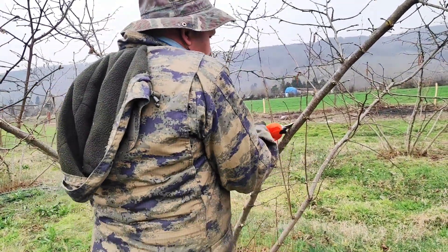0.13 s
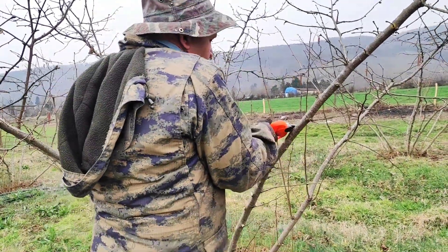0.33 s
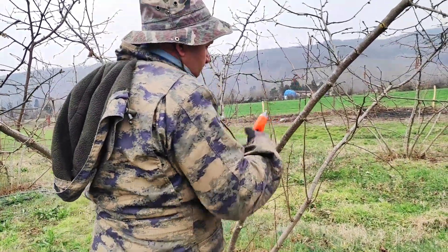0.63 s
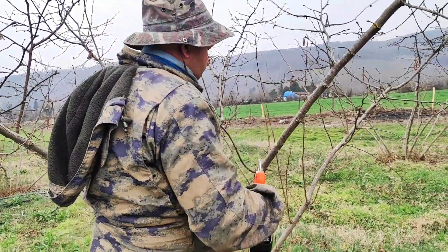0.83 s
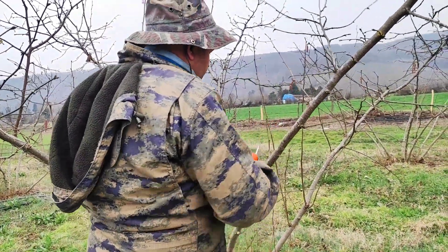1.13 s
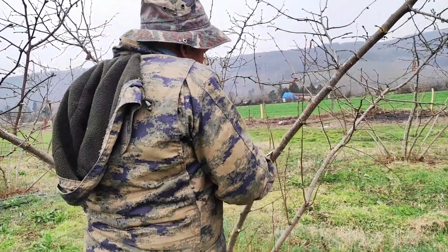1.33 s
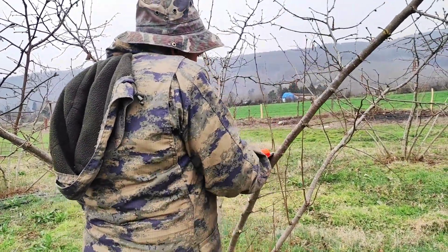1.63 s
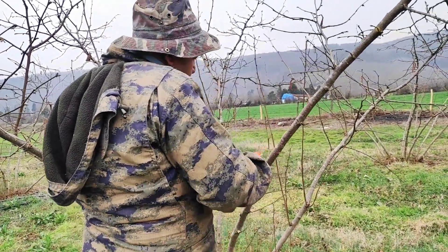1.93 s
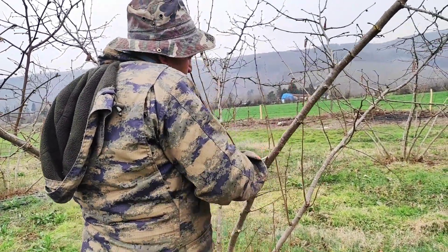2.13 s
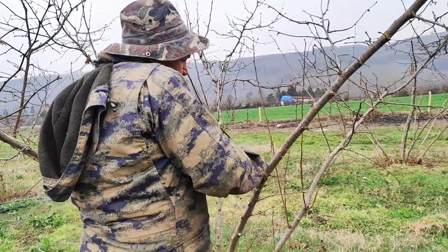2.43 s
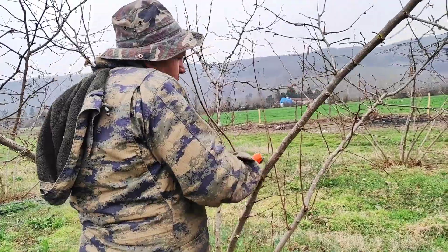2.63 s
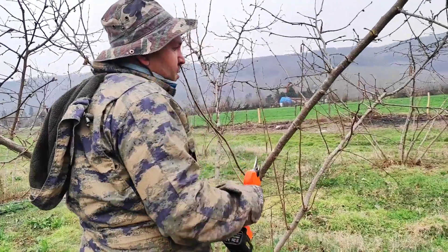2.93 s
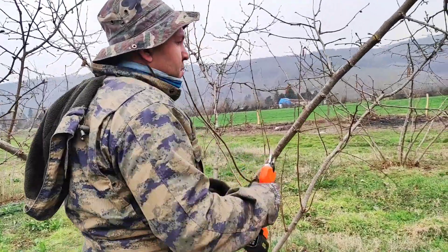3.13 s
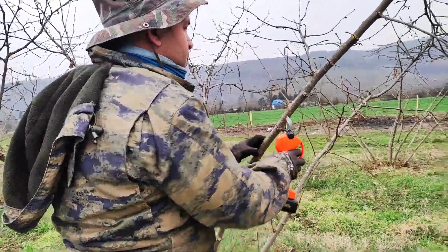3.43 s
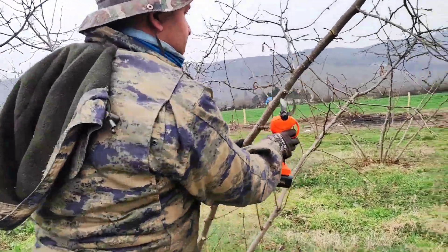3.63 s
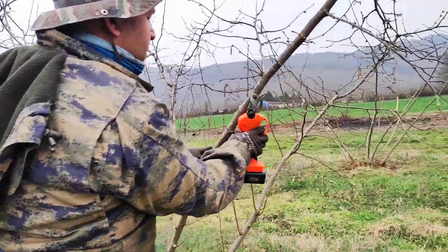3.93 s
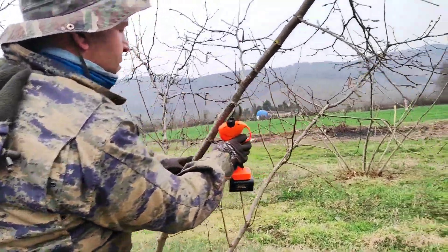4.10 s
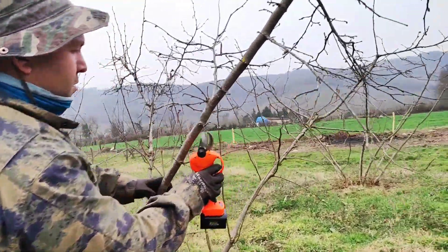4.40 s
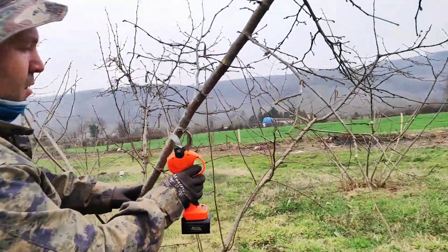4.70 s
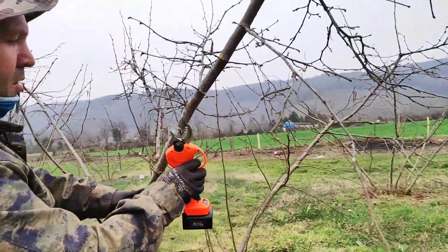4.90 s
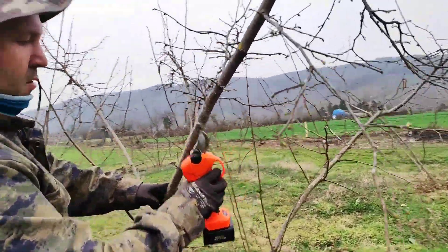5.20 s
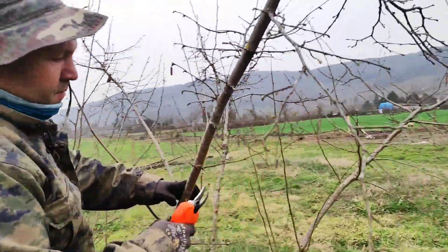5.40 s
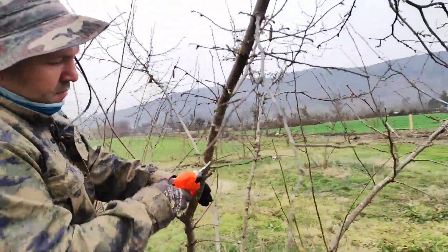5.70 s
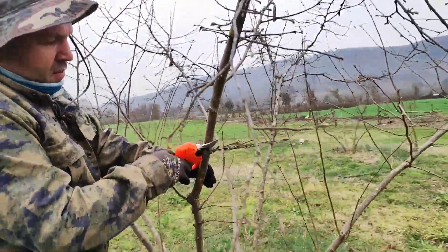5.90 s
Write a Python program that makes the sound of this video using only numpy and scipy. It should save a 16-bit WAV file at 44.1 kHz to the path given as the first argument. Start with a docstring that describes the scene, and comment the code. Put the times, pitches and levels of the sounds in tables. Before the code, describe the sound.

Battery pruning shears whir in short geared bursts after small trigger clicks, twigs snapping and sleeves rustling, with low wind buffeting the microphone.

```python
"""Powered pruning shears in an orchard

Trigger clicks start a geared motor, closing and opening a blade in turn: sines on multiples of the shaft
speed whir up and coast down over a noisy gear rattle. Twigs snap as short noise bursts, a branch knocks
as damped modes, and sleeve, gloves and twigs rustle as crackly filtered noise. Light wind buffets the
microphone with low rumble and puffs; a far bird chirps in gliding sines over a quiet background noise.
"""
import sys
import numpy as np
from scipy import signal
from scipy.fft import rfft, irfft
from scipy.io import wavfile
from scipy.ndimage import uniform_filter1d

SR = 44100
rng = np.random.default_rng(int(sys.argv[2]) if len(sys.argv) > 2 else 0)


def generate_wav(signal):
    """Clip the signal to [-1, 1] and save it as 16-bit WAV at the path in sys.argv[1]."""
    frames = np.transpose(np.atleast_2d(signal))
    scaled = np.clip(frames, -1, 1) * 32767
    pcm = np.round(scaled).astype(np.int16)
    wavfile.write(sys.argv[1], SR, pcm)


N = 266849
EDGE_HZ = 15700  # upper band limit

# Colour of the plastic housing: (frequency [Hz], relative spectrum level [dB])
HOUSING = [(200, -19.5), (300, -12), (900, -10), (1050, -6), (1460, -12.5), (2150, 1.5), (2450, -3),
           (2800, -3), (3500, -11), (4400, -8.5), (5600, 0), (6800, -6), (8200, -6), (9000, -15.5),
           (13500, -19), (16000, -13)]


def amp(db):
    """Level law: decibels to amplitude gain."""
    return 10 ** (np.asarray(db) / 20)


def evened(x):
    """Power normalisation: scales a signal to rms 1."""
    return x / np.sqrt(np.mean(x ** 2) + 1e-20)


def read(points, hz):
    """Spectral interpolation: reads a table of points on a log-frequency axis."""
    f, value = np.transpose(points)
    return np.interp(np.log(hz + 1), np.log(f + 1), value)


def add(mix, s, sound):
    """Superposition: adds a sound in place from time s."""
    part = mix[max(round(s * SR), 0):][:len(sound)]
    part += sound[:len(part)]


def coloured(x, points, lo_hz=0, hi_hz=SR):
    """Linear filtering: weights the spectrum by a table and keeps only lo_hz to hi_hz."""
    hz = np.fft.rfftfreq(len(x), 1 / SR)
    in_band = (hz >= lo_hz) * (hz < hi_hz)
    return irfft(rfft(x) * amp(read(points, hz)) * in_band, len(x))


def wobble(count, size):
    """Low-passed noise: a slow random curve of rms 1, smoothed twice over size samples."""
    smooth = uniform_filter1d(rng.standard_normal(count), size)
    return evened(uniform_filter1d(smooth, size))


def grit(count, per_s, spread_db, hiss):
    """Shot noise: random decaying impacts of uneven size raise a steady hiss."""
    size = amp(spread_db * np.minimum(rng.exponential(1, count), 5))
    impacts = size * (rng.random(count) < per_s / SR)
    burst = np.exp(-np.arange(200) / 35.0)
    envelope = hiss + evened(signal.oaconvolve(impacts, burst)[:count])
    return envelope * rng.standard_normal(count)


def brush():
    """Stick-slip friction: cloth and twigs crackle in four ranges that flutter each on their own."""
    # Passes of sleeve and twigs: (start [s], length [s], level below 4.5 kHz [dB], level above [dB])
    passes = [(0.091, 0.042, -73.5, -77), (.42, 0.35, -72, -76), (.85, 0.44, -65, -71), (1.04, 1, -81, -75),
              (1.106, .045, -67, -55), (1.155, 0.044, -52, -57), (1.251, 0.041, -60, -80),
              (1.42, 0.18, -70, -95), (1.73, .11, -77, -89), (2.131, 0.043, -60.5, -74),
              (2.41, 0.073, -64, -65), (2.62, 0.31, -70, -77), (2.96, 0.044, -63, -57),
              (2.999, .13, -56.5, -52), (3.09, .1, -66, -64), (3.168, 0.14, -59, -57),
              (3.27, 0.25, -63.5, -63.5), (3.4, .18, -66.5, -69), (3.53, 0.1, -63.5, -62),
              (3.581, .17, -52.5, -52.5), (3.649, 0.12, -56.5, -56.5), (3.72, 0.16, -55.5, -50.5),
              (3.79, 0.29, -59.5, -47.5), (4.028, 0.12, -58, -52.5), (4.13, .07, -73, -60),
              (4.2, 0.038, -73, -74), (4.55, 0.15, -60.5, -61), (4.672, 0.13, -60, -58.5),
              (4.8, 0.13, -59.5, -62), (5.07, 0.095, -56, -52), (5.478, 0.11, -60, -54),
              (5.56, 0.14, -63, -61), (5.659, 0.16, -63.5, -62)]
    # Colour of the rubbing: (frequency [Hz], relative spectrum level [dB])
    cloth = [(120, -67), (200, -5.5), (635, -6), (1000, -8), (1560, -8.5), (1810, -5), (2860, 0),
             (3370, -9.5), (10000, -19), (13000, -19.5), (16000, -13)]
    # Level of cloth at rest: (below 4.5 kHz [dB], above 4.5 kHz [dB])
    still_db = (-74, -79)
    swell_share = 0.86  # share of a pass spent swelling and fading
    rub = grit(N, per_s=600, spread_db=4, hiss=2.5)
    edges = (0, 1600, 4500, 9000, SR)  # Hz
    parts = [coloured(rub, cloth, a, b) * amp(3.1 * wobble(N, size=200)) for a, b in zip(edges, edges[1:])]
    low, top = np.full((2, N), 1.) * amp(still_db)[:, None]
    for s, length, low_db, top_db in passes:
        shape = signal.windows.tukey(round(length * SR), min(swell_share, 1))
        add(low, s, amp(low_db) * shape)
        add(top, s, amp(top_db) * shape)
    return low * evened(parts[0] + parts[1]) + top * evened(parts[2] + parts[3])


def wind():
    """Turbulent pressure at the microphone: lumpy low-frequency noise with single puffs."""
    # Slow course of the rumble: (time [s], level [dB])
    gusts = [(0.0, -53.5), (0.23, -61), (0.49, -51.5), (1.11, -58.5), (1.13, -53.5), (1.68, -53),
             (1.74, -47), (1.77, -52), (2.96, -61), (3.17, -52.5), (3.44, -59), (3.71, -54.5),
             (4.36, -61.5), (4.4, -60), (5.04, -65.5), (5.9, -51.5), (5.93, -48), (6.05, -59)]
    # Colour of the rumble: (frequency [Hz], relative spectrum level [dB])
    buffet = [(8.8, -7), (15, 9.5), (32, 3.5), (51, 0.5), (93, -8.5), (210, -19.5), (247, -17), (400, -35),
              (520, -54), (880, -120)]
    # Single puffs: (time [s], peak level [dB], width [s], push 1 or pull -1)
    puffs = [(0.502, -35, 0.0028, 1), (0.561, -37, 0.0065, -1), (0.771, -41, 0.005, 1),
             (.83, -47, .002, -1), (0.929, -45, 0.0013, 1), (1.14, -45.5, 0.0022, 1),
             (1.368, -45, 0.0025, -1), (1.652, -43.5, 0.0016, 1), (1.738, -41.5, 0.0063, 1),
             (1.744, -36, 0.0031, -1), (1.97, -39.5, .003, 1), (2.278, -45, 0.0017, -1),
             (2.429, -44, .003, -1), (2.476, -43, 0.0026, 1), (3.183, -37.5, 0.0026, -1),
             (4.552, -45.5, 0.0015, -1), (5.939, -35.5, 0.0021, 1)]
    t = np.arange(N) / SR
    lumps = amp(4.7 * wobble(N, size=700))
    rumble = evened(coloured(lumps * rng.standard_normal(N), buffet, 16, 480))
    out = rumble * amp(np.interp(t, *np.transpose(gusts)))
    for s, db, width, sign in puffs:
        u = (t - s) / width
        # a bell-shaped pulse that swings back on both sides
        out += np.sign(sign) * amp(db) * (1 - 0.53 * u ** 2) * np.exp(-u ** 2 / 2)
    return out


def field():
    """Stationary background: steady filtered noise forms the quiet field."""
    # Colour of the background: (frequency [Hz], relative spectrum level [dB])
    background = [(59, -31), (100, -28.5), (210, -36), (302, -13), (558, -8.5), (691, -12), (1330, -17.5),
                  (2860, -31.5), (8830, -29), (12100, -36), (16000, -33)]
    return amp(-73) * evened(coloured(rng.standard_normal(N), background, 100))


def snap(db, low_db, top_db):
    """Brittle fracture: fibres give way in a sharp break, then noise that decays exponentially."""
    fibre_t60_s, break_db = 0.017, 11
    t = np.arange(-300, 1748) / SR  # the break is at t = 0
    envelope = np.where(t < 0, np.exp(t / 0.00011), amp(-60 * t / fibre_t60_s))
    crack = rng.standard_normal(len(t)) * envelope
    crack = crack + amp(break_db) * ((t == 0) - .7 * (t == 2 / SR))  # a push and its rebound
    colour = [(400, low_db - 14), (1400, low_db + 1.5), (3100, 0),
              (6500, 0.7 * top_db + 1.0), (13000, 1.19 * top_db - 4.5)]  # (Hz, dB)
    crack = coloured(crack, colour, 0, EDGE_HZ)
    return amp(db) * crack / abs(crack).max()


def click(db, low_db):
    """Impulse response of a switch: contact noise and damped modes, repeated by two bounces."""
    # Trigger modes: (frequency [Hz], relative level [dB], 60 dB decay time [s])
    modes = [(2120, 15.5, 0.024), (2527, 19, 0.02), (4050, -25, 0.039), (4615, 5.5, 0.016), (4850, 3, 0.02),
             (5380, 0, 0.031), (7170, -15.5, 0.03), (8130, -4.5, 0.026), (9340, -52, 0.0041)]
    t = np.arange(2000) / SR
    ring = np.zeros(len(t))
    for hz, level, t60 in modes:
        decay = amp(level + low_db * (hz < 3000) - 60 * t / t60)
        ring += decay * np.sin(2 * np.pi * (hz * t + rng.random()))
    ring = ring + .5 * rng.standard_normal(len(t)) * amp(-60 * t / 0.0049)  # contact crack
    ring = ring * (1 - np.exp(-t / 0.000087))  # soft onset
    first_bounce = 0.17 * np.pad(ring, (60, 0))[:len(t)]
    second_bounce = 0.41 * np.pad(ring, (150, 0))[:len(t)]
    ring = ring + first_bounce + second_bounce
    return amp(db) * ring / abs(ring).max()


def rattle(low_db, mid_db, top_db, growth_db):
    """Impact excitation: gear teeth knock the plastic housing, heard in three wavering ranges."""
    # Time to build up: (low range [s], middle [s], top [s])
    build_s = (0.019, 0.031, .05)
    # Fading after the drive stops: (low range [dB/s], middle [dB/s], top [dB/s])
    coast_db_per_s = (248, 434, 410)
    lag_s, drive_s = 0.0076, 0.21  # start and end of the drive after the trigger
    t = np.arange(0, .32, 1 / SR)
    teeth = grit(len(t), per_s=900, spread_db=3., hiss=2.5)
    low = coloured(teeth, HOUSING, 0, 3700) / np.std(coloured(teeth, HOUSING, 1500, 3500))
    mid = evened(coloured(teeth, HOUSING, 3700, 8800))
    top = evened(coloured(teeth, HOUSING, 8800))
    load_db = growth_db * (np.minimum(t / drive_s, 1) - .5)
    out = np.zeros(len(t))
    for x, db, build, coast in zip((low, mid, top), (0, mid_db, top_db), build_s, coast_db_per_s):
        rise = np.clip((t - lag_s) / build, 0, 1)
        fade_db = coast * np.maximum(t - drive_s, 0)
        out += x * rise * amp(low_db + db + load_db - fade_db + 0.58 * wobble(len(t), size=150))
    return out


def whine(closing, sag, *tone_db):
    """Order tones: wavering sines on shaft multiples sweep through the housing's resonances."""
    # Speed after the trigger: (time [s], share of full speed [0-1])
    spin = [(.022, .1), (.034, .5), (.046, .87), (.055, .97), (.066, 1), (.205, 1), (.222, .8), (.25, .3),
            (.275, .05)]
    # Rotor and planetary gear tones: (multiple of the shaft frequency, ...)
    multiples = (4, 5, 7, 7.9, 8, 8.2, 8.8, 9, 9.2, 9.8, 10, 10.2, 10.5, 10.95, 11.67, 12, 16, 20, 21,
                 21.67, 21.97, 24, 29, 31.4)
    # Relative level of each multiple: (while opening [dB], while closing [dB])
    tones = [(-4.5, -5), (-14.5, -11.5), (-6.5, -5.5), (2.5, -5), (-7, -18), (1.3, -9), (-39, -14),
             (-7, -10), (-2, -22), (-19, -12), (-3, -16), (-3, -10), (4.5, -9.5), (-31, -0.5), (-19, 8.5),
             (1, 2), (-9, -5), (-6, -9.5), (-22, -12), (-45, -0.6), (-19, -11), (-38, -26), (-20, -33),
             (-25, -15)]
    # Frequencies at which tone_db holds, as the tool turns: (frequency [Hz], ...)
    facing_hz = (1050, 2100, 2750, 3130, 5500)
    shaft_hz = 261.3  # at full speed without load
    unload_db_per_s = 30  # for each multiple of the shaft
    sweep_share = .9  # how strongly a gliding tone takes on the housing's colour
    t = np.arange(0, .29, 1 / SR)
    speed = np.interp(t, *np.transpose(spin), left=0, right=0)
    load = 1 - sag * np.clip(t / .2, 0, 1) ** 2  # the speed sags under load
    turns = np.cumsum(shaft_hz * speed * load) / SR
    coasting = np.maximum(t - spin[5][0], 0)  # without drive the teeth unload and high tones die first
    pull = np.clip(np.gradient(speed) * SR / 30, 0, 1)  # teeth press hardest while the rotor accelerates
    facing = list(zip(facing_hz, tone_db))
    out = np.zeros(len(t))
    for k, db in zip(multiples, tones):
        full_hz = k * shaft_hz
        level_db = db[int(closing)] + read(facing, full_hz) + 2.66 * wobble(len(t), size=400)
        housing_db = sweep_share * (read(HOUSING, full_hz * speed) - read(HOUSING, full_hz))
        drive_db = 1.2 * pull - unload_db_per_s * k * coasting
        slip = (0.14 + 0.021 * k) * wobble(len(t), size=500)  # backlash smears the phase [rad]
        tone = np.sin(2 * np.pi * (k * turns + rng.random()) + slip)
        out += amp(level_db + housing_db + drive_db) * tone
    return np.sqrt(2) * out * speed ** 1.43  # louder with speed


def knock(db, low_hz, high_hz, high_db, rise, t60):
    """Modal vibration: three damped branch modes ring after a soft blow."""
    t = np.arange(3000) / SR
    high = np.sin(2 * np.pi * high_hz * t) + 0.37 * np.sin(2 * np.pi * 1.197 * high_hz * t)
    ring = np.sin(2 * np.pi * low_hz * t) + amp(high_db) * high
    decay = amp(-60 * np.maximum(t - rise, 0) / t60)
    ring = ring * decay * np.sin(np.pi / 2 * np.minimum(t / rise, 1)) ** 2
    return amp(db) * ring / abs(ring).max()


def chirp(length, from_hz, to_hz, db):
    """Frequency modulation: a short whistle glides linearly in pitch."""
    t = np.arange(0, length, 1 / SR)
    cycles = np.cumsum(np.linspace(from_hz, to_hz, len(t))) / SR
    return amp(db) * np.sin(2 * np.pi * cycles) * signal.windows.tukey(len(t), .5)


def scene():
    """Superposition of brushing, wind, quiet field, shears, twigs, branch and bird."""
    # Blade strokes: (trigger time [s], click peak [dB], click modes below 3 kHz [dB], closing 1 or opening 0,
    # speed sag [0-1], rattle level at 1.5-3.5 kHz [dB], middle range above that [dB], top range above that [dB],
    # rattle growth over the drive [dB], then five tone levels at the facing frequencies of the whine [dB])
    strokes = [(.19, -31.5, -13, 1, 0.025, -56, 0.5, -7, 6.5, -63.5, -57.5, -65, -67.5, -55),
               (.607, -31, -23, 0, 0.00094, -53.5, 0, -10.5, 2, -56.5, -62.5, -61, -63, -49),
               (1.474, -40, -25, 1, 0.0023, -58.5, 0, -10, 4.5, -57.5, -67, -101, -74.5, -56.5),
               (1.838, -37, -25, 0, 0.0015, -55, -3, -11.5, 0, -58, -60.5, -65, -71, -55.5),
               (2.182, -39, -12, 1, 0.0026, -57, -1.5, -8, 4, -60, -64, -60, -81, -61),
               (2.729, -34.5, -21.5, 0, .0007, -53.5, -2, -8, 4.5, -54, -59.5, -62, -67, -49.5),
               (3.809, -30.5, -16, 1, 0.024, -53.5, 5.5, -4.5, 4, -57, -60, -43.5, -85, -53),
               (4.279, -28.5, -4, 0, 0.0015, -51, -3.5, -7, 2.5, -55.5, -55, -50.5, -67, -55),
               (4.855, -33, -10, 1, .0004, -53, 1, -0.5, 7, -53, -54.5, -41.5, -85, -47.5),
               (5.218, -27, -6.5, 0, 0.0014, -51, -2.5, -6.5, -3.5, -53.5, -59.5, -57.5, -58.5, -56),
               (5.79, -36.5, -15, 1, 0.014, -53.5, -0.5, -3.5, 2.5, -53.5, -72, -60, -77, -52.5)]
    # Twig snaps and scrapes: (time [s], peak level [dB], bass tilt [dB], treble tilt before scaling [dB])
    snaps = [(0.1782, -36, -3, -48), (0.214, -39, -6, -27), (0.3846, -24.5, 9, -2),
             (0.4692, -39, -4, -10.5), (0.4937, -46.5, -14, -23), (0.6321, -33.5, -22, -24),
             (0.899, -47, 4, -19), (0.9308, -38.5, -2, -36), (0.999, -28.5, 6.5, -50),
             (1.1198, -44, -27, -14), (1.134, -34.5, -18, -16), (1.1677, -34, 5, -19),
             (1.1734, -32, -5, -8), (1.1771, -32, 12, -13), (1.2603, -45, 5, -12), (1.265, -39.5, 20, -15),
             (1.4602, -47, 6, -27), (1.663, -32.5, 15.5, 5), (1.7518, -41.5, 2, -11), (2.163, -41, 0, -25),
             (2.2059, -35, 8, -10), (2.4, -32, -22, -16), (2.4307, -44, 4, -15), (2.457, -39.5, 1, -11.5),
             (2.5288, -53, -16, -2), (2.9669, -32.5, 8, -5), (2.9703, -25.5, -4, -10), (3.033, -35, 4, -15),
             (3.053, -32.5, -5, -18), (3.0623, -25.5, -6, -12), (3.0729, -25.5, -11, -11),
             (3.0855, -27.5, -12.5, -15), (3.098, -33, -9, -7), (3.118, -43, -5, 1), (3.1537, -45, -13, -8),
             (3.1744, -29, -15, -29), (3.186, -36, -16, -12), (3.1993, -29.5, -16, -12),
             (3.2092, -34, -9, -9), (3.2286, -39, -2.5, -11), (3.239, -44, -8, 2), (3.257, -29, 0, 19),
             (3.295, -44.5, 3, -7), (3.317, -38, 1, 10), (3.337, -30, 6, 30), (3.352, -37, -7, 12),
             (3.373, -39.5, 2, 9), (3.439, -42, 20.5, 11), (3.6392, -40.5, -15, -19),
             (3.6683, -33, -8, -33), (3.702, -33.5, -3, -20), (3.7164, -40, -4, 0), (3.778, -35.5, 4, -8),
             (3.8195, -16.5, -0.5, 4.5), (3.8404, -33, -3, -12), (3.855, -32, -9, -13),
             (3.877, -27.5, -5, -6), (3.9914, -44, 0, -5), (4.034, -31, -6.5, -10), (4.0467, -33, 0, 0),
             (4.052, -22.5, -2.5, -0.5), (4.089, -33.5, -1, -2), (4.112, -39, -6, 2), (4.122, -27, -5, -6),
             (4.158, -42, 6, -1), (4.1659, -37, 8.5, -5), (4.21, -39, -5, -6.5), (4.305, -33, -5, -18),
             (4.6027, -36, -7.5, -31), (4.6584, -31.5, -7, -27), (4.728, -43, 0, -16), (4.84, -40, 12, -3),
             (5.0863, -33, -15, -35), (5.0997, -29.5, -18.5, -43), (5.1069, -35, -23, -33),
             (5.115, -31, -20, -21), (5.1211, -25, -15, -6), (5.1321, -29, -4, -26), (5.242, -35, -2, -11),
             (5.26, -45, -2, -3), (5.5427, -36, -9, -16), (5.5807, -39.5, -1, -4), (5.632, -37, -13, -2),
             (5.639, -34, 4, 0), (5.653, -28.5, -17, -2.5), (5.697, -37.5, -14, -29),
             (5.7515, -35.5, 12, 6)]
    # Dull branch knocks: (time [s], peak level [dB], low mode [Hz], high mode [Hz],
    # high mode above the low [dB], rise [s], 60 dB decay time [s])
    knocks = [(0.999, -39, 455, 1015, 15, 0.0018, 0.06), (1.166, -41, 316, 700, 5, 0.0018, 0.024),
              (1.268, -41.5, 256, 560, -2, 0.0018, 0.028), (2.142, -36, 426, 990, 5, 0.0016, 0.028),
              (2.845, -35, 510, 900, 0.5, 0.0037, 0.0024), (5.491, -32, 366, 614, -3, 0.0037, 0.024),
              (5.51, -29.5, 457, 798, 3, 0.0014, 0.036), (5.514, -19.5, 417, 738, 3, 0.0039, 0.01),
              (5.649, -31, 542, 752, -5, 0.0046, 0.018), (5.752, -34, 507, 980, -1, 0.0011, 0.028)]
    # Bird: (time [s], length [s], start frequency [Hz], end frequency [Hz], peak level [dB])
    chirps = [(4.75, 0.05, 4050, 4080, -73), (5.7, 0.041, 2950, 2880, -76), (5.757, 0.047, 3070, 3450, -61)]
    mix = brush() + wind() + field()
    for s, *row in snaps:
        add(mix, s - 300 / SR, snap(*row))  # puts the break itself at s
    for s, db, low_db, closing, sag, *levels in strokes:
        add(mix, s, click(db, low_db))
        add(mix, s, rattle(*levels[:4]))
        add(mix, s, whine(closing, sag, *levels[4:]))
    for s, *row in knocks:
        add(mix, s, knock(*row))
    for s, *row in chirps:
        add(mix, s, chirp(*row))
    return mix[None]


def record(dry):
    """Band limitation: a linear-phase low-pass removes the highest treble."""
    lowpass = signal.firwin(255, EDGE_HZ, window=("kaiser", 9), fs=SR)
    return signal.oaconvolve(dry, lowpass[None], "same")


dry = scene()
out = record(dry)
generate_wav(out)
```